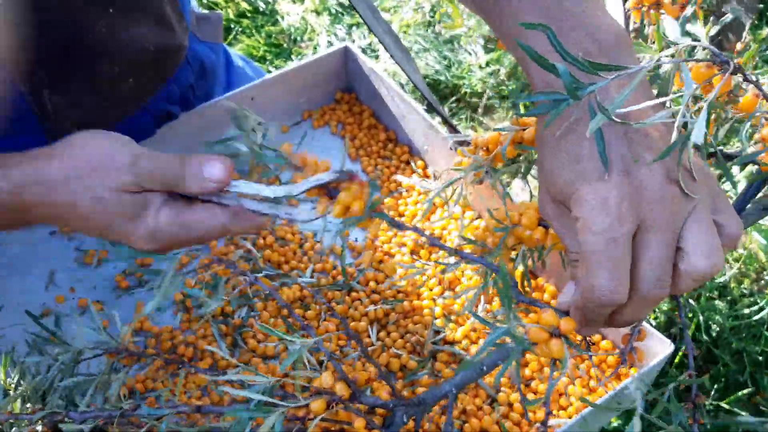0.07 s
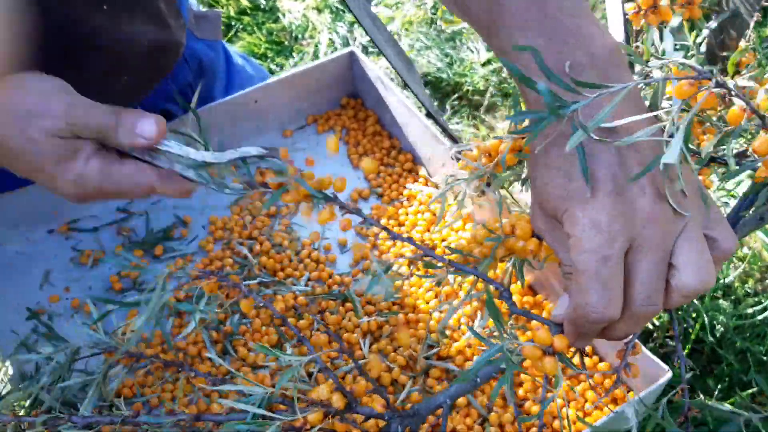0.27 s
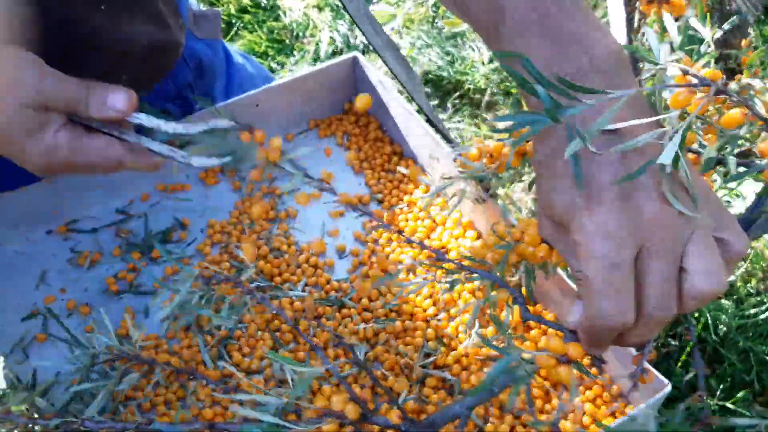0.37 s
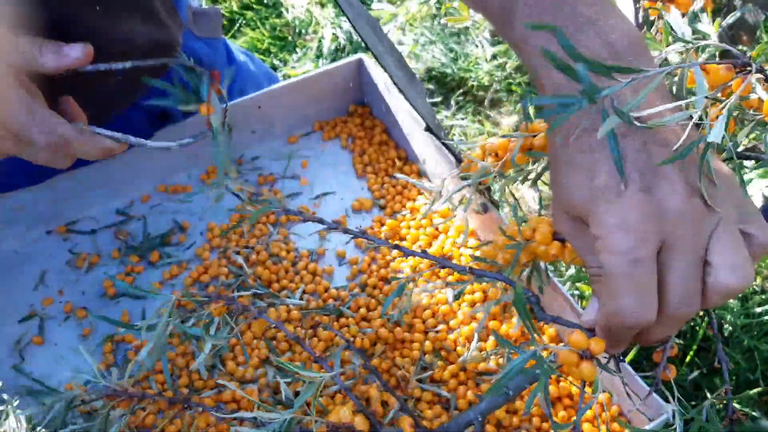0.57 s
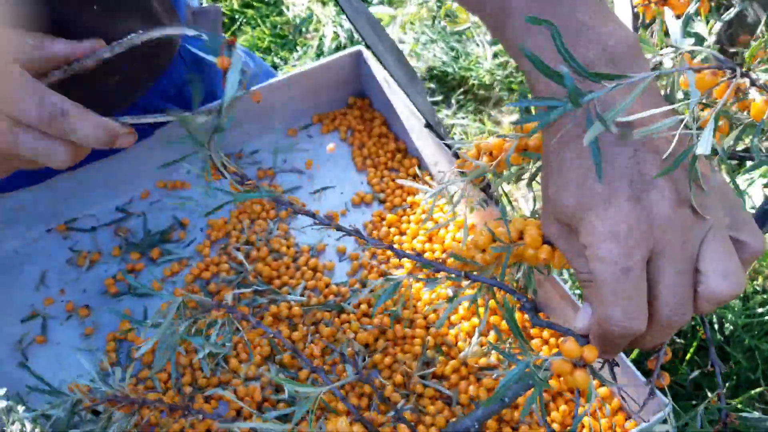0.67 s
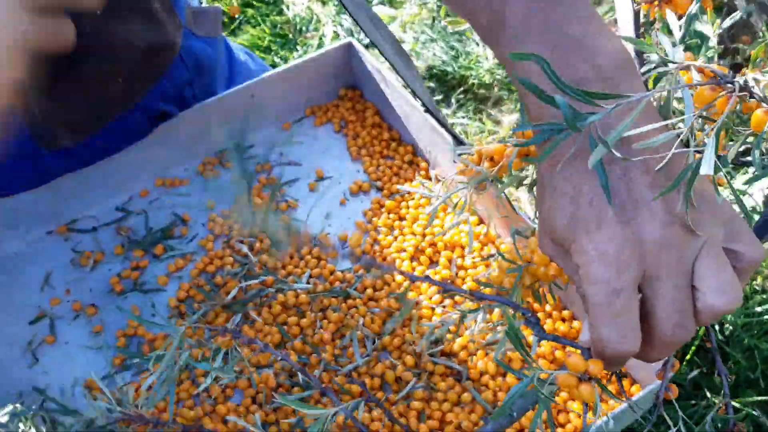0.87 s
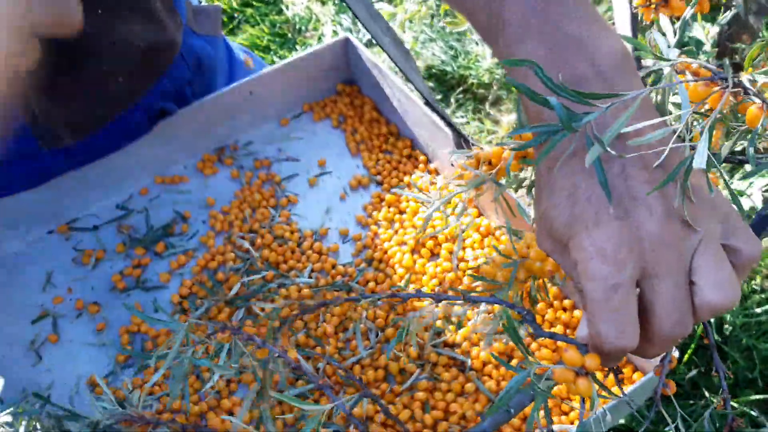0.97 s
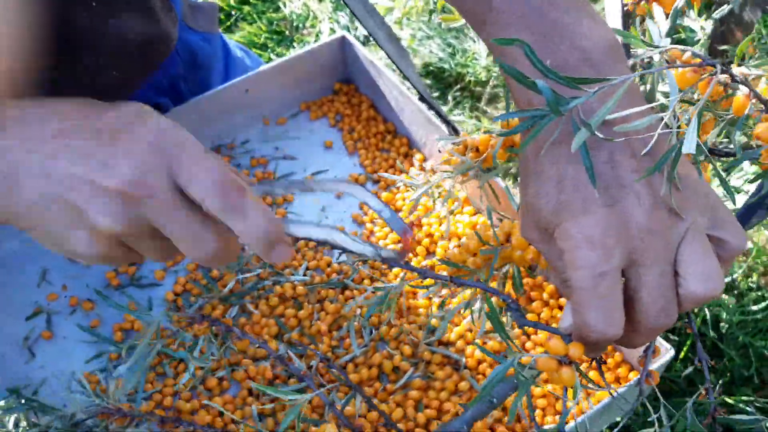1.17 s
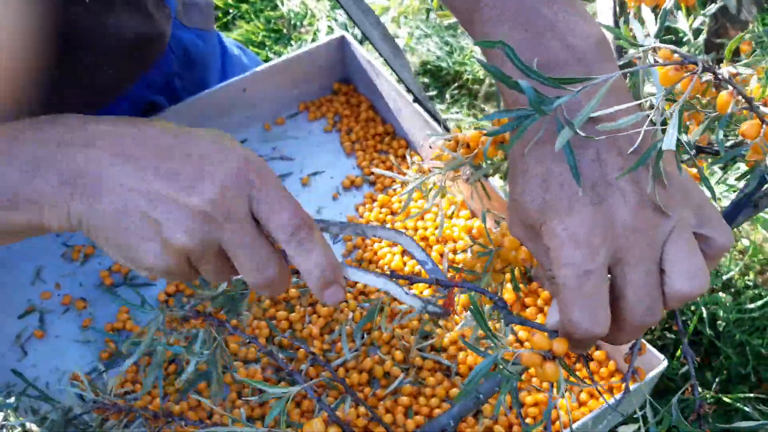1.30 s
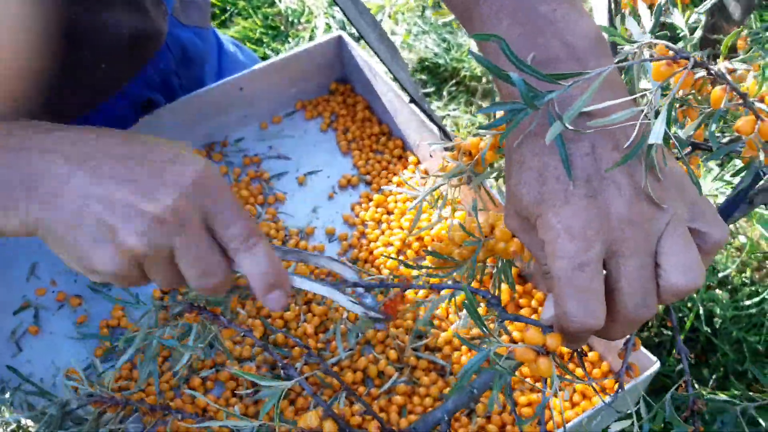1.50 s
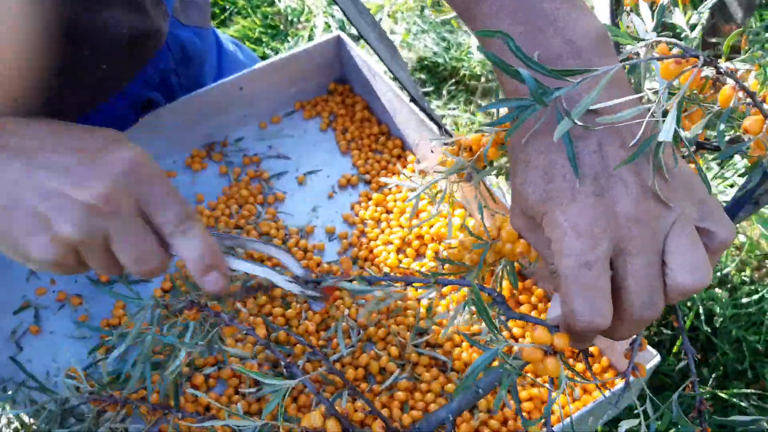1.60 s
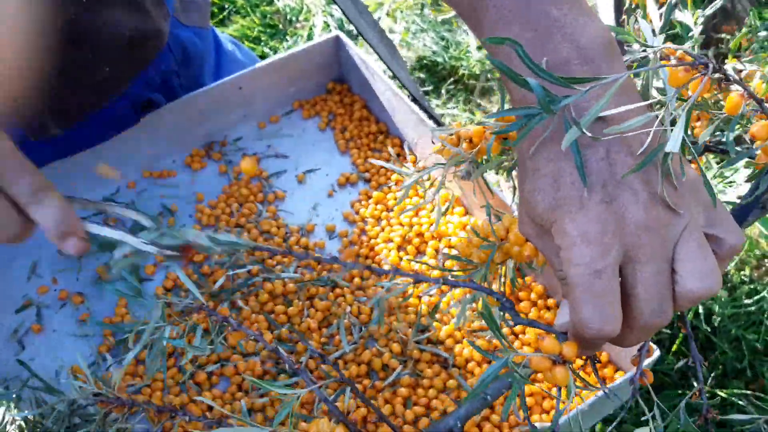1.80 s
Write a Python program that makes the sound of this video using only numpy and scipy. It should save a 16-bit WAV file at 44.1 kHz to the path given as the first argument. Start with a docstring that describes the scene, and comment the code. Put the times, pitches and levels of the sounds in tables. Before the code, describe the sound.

Berries are stripped from a branch outdoors, with crisp stalk snaps, rustling leaves and a scraping twig from the start. From about 0.2 to 0.7 seconds they patter into a box with soft, hollow knocks, and two faint ones follow around 1 second. Light wind bumps the microphone on the right, strongest near 0.6 seconds. After a lull, a second pull brings more snaps from 1.7 seconds.

```python
"""Outdoors, over a shallow box, berries are stripped from a branch with wire tongs.
Stalks snap and leaves hiss through the tongs while the twig scrapes; the berries drop,
knock on the floor of the box and set it ringing. A second pull begins at the end.
A light breeze buffets the right side of the microphone over a faint bed of open air."""
import sys
import numpy as np
from scipy import signal
from scipy.fft import rfft, irfft
from scipy.io import wavfile
from scipy.ndimage import uniform_filter1d

SR = 44100
rng = np.random.default_rng(int(sys.argv[2]) if len(sys.argv) > 2 else 0)


def transcribe(u):
    """Save the signal u as a 16-bit wav file named by the first command-line argument.

    u: samples, shape (n,) or (channels, n), limited to [-1, 1]; the rate is SR.
    q: integer samples, one column per channel.
    """
    v = np.clip(np.atleast_2d(u).T, -1, 1)
    q = np.round(v * 32767).astype(np.int16)
    wavfile.write(sys.argv[1], SR, q)


N = 81585
TIME = np.arange(N) / SR
HIGH_CUT_HZ, BOX_HIGH_HZ, TWIG_WIDTH = 16850, 2920, 0.61
# modes of the box, the main floor mode first: (frequency [Hz], level [dB], t60 [s])
BOX_MODES = [(618.8, 3.5, .14), (259, -2, 0.078), (289, -2.5, 0.19), (393, -7, 0.17), (429.5, -17, 0.45),
             (484.5, -5, 0.18), (722, -7, 0.12), (910, -6.5, 0.12), (1033, -17, 0.21), (1106.4, -10, 0.15),
             (1270, -8.5, 0.1), (1355, -20, .15), (1594, -6, 0.073), (1860, -7, 0.087), (2098, -7, 0.04),
             (2144, -8.5, 0.061), (2387, -0.5, 0.1)]


def from_db(db):
    """Decibels to gain."""
    return 10 ** (np.asarray(db) / 20)


def rms_one(x):
    """Scale to rms 1."""
    return x / np.sqrt(np.mean(x ** 2) + 1e-20)


def fader(curve):
    """Gain ride through (time [s], level [dB]) points."""
    return from_db(np.interp(TIME, *np.transpose(curve)))


def pan(db):
    """Left and right gains; positive dB leans left."""
    return from_db(np.array([[db], [-db]]) / 2)


def colour(x, spectrum):
    """EQ through (frequency [Hz], level [dB]) points; rms 1."""
    hz, db = np.transpose(spectrum)
    bins = np.maximum(np.arange(N // 2 + 1) * SR / N, 1)
    gains = from_db(np.interp(np.log(bins), np.log(hz), db))
    return rms_one(irfft(rfft(x) * gains, N))


def noise(width):
    """Stereo white noise; width 0 is mono, 1 is fully wide."""
    mid, side = rng.standard_normal((2, N))
    return rms_one(np.array([mid + width * side, mid - width * side]))


def band(x, low_hz, high_hz):
    """Band-pass; rms 1."""
    return rms_one(signal.sosfilt(signal.butter(2, [low_hz, high_hz], "band", fs=SR, output="sos"), x))


def drift(per_s):
    """Random wander through per_s points a second; rms 1."""
    return rms_one(np.interp(TIME * per_s, np.arange(N), rng.standard_normal(N)))


def decay(t, t60):
    """Envelope that falls 60 dB in t60 seconds."""
    return from_db(-60 * t / max(t60, .001))


def swell(peak_s, db, half_length):
    """Bell-shaped fade in and out."""
    return from_db(db) * np.exp(-.5 * ((TIME - peak_s) / half_length) ** 2)


def add(out, start_s, sound):
    """Mix a stereo sound in at a time."""
    i = max(int(start_s * SR), 0)
    out[:, i:i + sound.shape[1]] += sound[:, :N - i]


def box_ring(t, drive_db=0, sustain=1):
    """The struck box rings in decaying sines; the main mode starts inward, the others either way."""
    hz, db, t60 = np.transpose(BOX_MODES)
    polarity = np.append(1, rng.choice([-1, 1], len(hz) - 1))
    gains = from_db(db + drive_db) * polarity
    return sum(g * decay(t, d * sustain) * np.sin(2 * np.pi * f * t) for g, f, d in zip(gains, hz, t60))


def berries():
    """Each berry thuds and rings the box; soft landings lose the highs, those near a wall the lows."""
    # landings: (time [s], level [dB], brightness [Hz], ring length [ratio], main mode drive [dB],
    # low cut [Hz], note of the spot hit [Hz], level of that note [dB])
    landings = [(.216, -56.5, 600, 0.91, -21, 180, 323, 14),
                (0.2311, -37.5, 1430, 0.74, -0.5, 140, 242, 4.5), (0.292, -45.5, 640, 1, -3, 180, 304, -6),
                (0.3883, -37.5, 995, .8, 0, 170, 664, 4.5), (.468, -44.5, 607, 0.36, 8, 162, 250, -15),
                (.4705, -35.5, 670, 0.47, 7, 141, 233, 3.5), (.487, -37.5, 610, 0.42, -2, 150, 232, -9),
                (0.5156, -32.5, 1190, 0.74, -5.5, 250, 900, -2.5),
                (0.535, -37, 2200, 0.9, -7.5, 347, 1080, -4), (0.5556, -34.5, 650, 0.21, 0.5, 161, 285, 2),
                (.5585, -33, 670, 0.87, 6.5, 162, 293, 8.5), (0.6392, -31, 1720, 0.91, 3, 320, 840, 0.5),
                (.647, -31.5, 2110, 0.73, -33, 630, 1056, -21),
                (0.6674, -29, 397, 0.34, -13, 160, 292, 6.5), (0.6866, -35.5, 380, 0.46, -7, 150, 267, 3.5),
                (.711, -45, 360, 0.34, -5, 180, 307, 10), (0.9224, -50.5, 640, 0.45, -1.5, 170, 279.6, 8),
                (1.092, -55.5, 1310, 0.68, -4.5, 151, 269.5, 3.5)]
    out, t = np.zeros((2, N)), TIME[:N // 6]
    mode_spread_db, detune, push_hz = 1.5, .008, 500
    for start, db, bright_hz, sustain, main_db, low_hz, spot_hz, spot_db in landings:
        drive_db = mode_spread_db * rng.standard_normal(len(BOX_MODES))
        drive_db[0] = main_db
        ring = box_ring(t * (1 + detune * rng.standard_normal()), drive_db, sustain)
        push = from_db(4) * decay(t, t60=.0052) * np.cos(2 * np.pi * push_hz * t)
        thud = from_db(spot_db) * decay(t, t60=.042) * np.cos(2 * np.pi * spot_hz * t)
        knock_noise = band(noise(width=.34)[:, :len(t)], 190, BOX_HIGH_HZ)
        knock = decay(t, t60=.05 * sustain) * knock_noise
        contact_eq = np.vstack([signal.butter(3, bright_hz, fs=SR, output="sos"),
                                signal.butter(2, low_hz, "high", fs=SR, output="sos")])
        add(out, start, from_db(db) * signal.sosfilt(contact_eq, ring + push + thud + knock))
    return pan(2) * out


def stalks():
    """A stalk tears in a short burst of fibre cracks; thicker ones sound woodier."""
    # stalk snaps and twig ticks on the tongs:
    # (time [s], level [dB], t60 [s], woody body [dB], pan left [dB], brightness [Hz])
    snaps = [(0.021, -54, 0.21, -26, 7, 14200), (0.0815, -37, 0.012, -8, 1, 13500),
             (.222, -41.5, 0.026, -6, 4, 16000), (0.234, -55, 0.027, -6, -8, 16000),
             (.244, -49, 0.027, 8.5, -11, 16000), (0.262, -46.5, 0.078, -7, 11, 16000),
             (.285, -39.5, 0.04, 0, -5, 16000), (0.2902, -38.5, 0.019, -8.5, 11, 16000),
             (0.292, -36.5, 0.018, -7.5, 3, 16000), (.307, -37.5, 0.014, -6.5, 1, 17000),
             (0.3355, -33.5, 0.021, -2, 2.5, 14400), (0.351, -46, 0.027, 6, -3, 16000),
             (0.351, -43, 0.059, -10, 3, 16000), (0.375, -35.5, 0.016, -11.5, 5, 17000),
             (0.399, -48.5, 0.12, 1, -14, 15000), (0.635, -45.5, 0.045, 6, -4, 14000),
             (0.653, -53.5, 0.012, 10.5, -11, 15000), (.687, -55.5, 0.02, 4, -9, 13000),
             (0.7409, -41.5, 0.038, -1.5, 5.5, 10700), (0.844, -51, 0.1, -11, 6, 14000),
             (0.85, -54, 0.15, -19, 1, 13700), (0.931, -54, 0.0076, -29, 8, 10060),
             (1.09, -49.5, 0.053, -8.5, 2.5, 10100), (1.203, -69, 0.061, 6, 1, 9100),
             (1.366, -61, 0.092, -3.5, 4.5, 11600), (1.739, -54, 0.023, -3, 4, 13000),
             (1.743, -44.5, 0.044, -2.5, 1, 12900), (1.754, -36.5, 0.02, -6.5, 5.5, 12200),
             (1.786, -42.5, 0.061, -7, 1, 12300), (1.7914, -38, 0.03, -5.5, 4, 11970),
             (1.8288, -34.5, 0.021, -5, 7, 12500)]
    # crisp top of cracking fibres: (frequency [Hz], level [dB])
    crack_eq = [(1500, -21), (3000, -63), (6000, -7.5), (7200, -0.5), (9000, 1.5), (11000, 6), (12800, 3.5),
                (15300, 5), (17000, -9.5)]
    # woody body of a stalk: (frequency [Hz], level [dB])
    wood_eq = [(500, -43), (1500, -7), (2400, -4.5), (2950, 3), (3600, -5), (4200, 0), (4600, 0),
               (5000, -3.5), (7000, -10.5), (9000, -18), (16000, -5)]
    out, t = np.zeros((2, N)), TIME[:N // 20]
    attack_s, hold_s, grain_db = .0004, .0009, 2
    fibres = noise(width=.9) * from_db(grain_db * drift(per_s=6000))
    crack = colour(fibres, crack_eq)
    wood = colour(noise(width=.9), wood_eq)
    for start, db, t60, wood_db, pan_db, bright_hz in snaps:
        i = rng.integers(N - len(t))
        burst = (crack + from_db(wood_db) * wood)[:, i:i + len(t)]
        envelope = np.minimum(t / attack_s, 1) * decay(np.maximum(t - hold_s, 0), t60)
        soften = signal.butter(1, min(bright_hz, HIGH_CUT_HZ), fs=SR)
        add(out, start, from_db(db) * pan(pan_db) * signal.lfilter(*soften, envelope * burst))
    return out


def leaves():
    """Leaves slip through the tongs in dense tiny ticks and hiss, roughened by small tears."""
    # leaf friction through the pulls: (time [s], level [dB])
    pull_ride = [(0, -57.5), (.07, -57.5), (.11, -61.5), (.21, -59.5), (.235, -45), (.28, -53),
                 (.32, -59.5), (.365, -52.5), (.405, -45), (.48, -49.5), (.62, -53.5), (.70, -62.5),
                 (.82, -66), (1.0, -71), (1.17, -78), (1.26, -75.5), (1.34, -85), (1.53, -77), (1.64, -62),
                 (1.73, -65), (1.76, -57.5), (1.815, -57.5), (1.85, -55)]
    # bright hiss of sliding leaves: (frequency [Hz], level [dB])
    leaf_eq = [(1470, -9), (2500, -5), (3440, -7.5), (4080, -6), (5740, -13.5), (7950, -6), (9360, -9),
               (12600, -6), (15300, -8), (16500, -44)]
    slips_per_s, grain_db, hiss_db = 6000, 2.8, 3
    tears_per_s, tear_depth = 320, .35
    slips = rng.random(N) < slips_per_s / SR
    slip_gains = from_db(grain_db * np.minimum(rng.exponential(1, N), 5))
    ticks = rms_one(slips * slip_gains * noise(width=1))
    friction = ticks + from_db(hiss_db) * noise(width=1)
    tears = (rng.random(N) < tears_per_s / SR) * rng.random(N)
    tear_tails = rms_one(signal.fftconvolve(tears, decay(TIME, t60=.009))[:N])
    roughness = rms_one(1 + tear_depth * tear_tails)
    return fader(pull_ride) * pan(4) * colour(friction * roughness, leaf_eq)


def twig():
    """The twig gives a duller scrape that also stirs the upper modes of the box."""
    # weight of the scrape: (time [s], level [dB])
    scrape_ride = [(0, -74), (.11, -65.5), (.15, -59), (.20, -61.5), (.26, -52), (.35, -62), (.41, -46.5),
                   (.56, -44), (.64, -47), (.72, -56), (.90, -58), (1.02, -64), (1.17, -69), (1.22, -67),
                   (1.32, -68), (1.55, -72), (1.65, -66.5), (1.85, -68)]
    # tone of the scraped twig: (frequency [Hz], level [dB])
    twig_eq = [(200, 13), (400, 2), (620, 15.5), (800, -7), (1080, 7.5), (1350, -2), (1800, -1.5),
               (2150, 5.5), (2550, 2.5), (3200, -1.5), (4300, -2), (6000, -10), (12000, -17)]
    ring = signal.fftconvolve(noise(TWIG_WIDTH), box_ring(TIME[:N // 6])[None])[:, :N]
    upper_ring = from_db(-7.5) * band(ring, 1090, BOX_HIGH_HZ)
    scrape = colour(noise(TWIG_WIDTH), twig_eq)
    return fader(scrape_ride) * pan(2) * (scrape + upper_ring)


def branch():
    """The branch brushes past leaves and box in faint, narrow-band swishes."""
    # swishes: (peak time [s], level [dB], half-length [s], low edge [Hz], high edge [Hz])
    swishes = [(0.157, -59, 0.013, 1043, 1110), (0.879, -57.5, 0.014, 1010, 1140),
               (1.233, -63, .045, 508, 583), (1.245, -75.5, .03, 6300, 7300)]
    return sum(swell(peak_s, db, half_length) * band(noise(TWIG_WIDTH), low_hz, high_hz)
               for peak_s, db, half_length, low_hz, high_hz in swishes)


def wind():
    """Each eddy is a dip of pressure that throbs briefly over a faint rumble, nearly all on the right."""
    # eddies on the microphone: (peak time [s], level [dB], half-length [s], throb [Hz])
    eddies = [(.181, -53.5, 0.016, 98), (0.372, -44, .0059, 80), (0.482, -43.5, 0.013, 76),
              (0.542, -39, 0.018, 78.4), (0.5834, -19.5, 0.0054, 131), (0.6, -22.5, 0.014, 87.5),
              (0.636, -35.5, 0.014, 99), (0.701, -40, 0.025, 66.3), (.853, -38.5, 0.0066, 96),
              (0.868, -30.5, 0.0066, 90.6), (0.912, -49, 0.032, 69), (0.956, -42, 0.0046, 75),
              (1.079, -47, 0.0095, 70), (1.13, -31, 0.0086, 89), (1.164, -31.5, 0.0044, 89),
              (1.208, -36.5, 0.013, 112), (1.231, -34, 0.0029, 134), (1.251, -28.5, 0.011, 80),
              (1.283, -24, 0.0043, 110), (1.352, -37.5, 0.0074, 95), (1.43, -38.5, 0.0073, 104),
              (1.486, -33.5, 0.0036, 108.5), (1.499, -41.5, 0.005, 75), (1.676, -50.5, 0.02, 69),
              (1.778, -49.5, 0.016, 65), (1.833, -43, 0.026, 72.3)]
    # wind rumble: (frequency [Hz], level [dB])
    rumble_eq = [(18, -39), (30, -27), (42, -2), (60, 10), (95, -2.5), (140, -1), (200, -13), (300, -17.5),
                 (600, -40.5), (1500, -67)]
    # the breeze building: (time [s], level [dB])
    breeze_ride = [(0, -106), (.17, -78), (.7, -55), (1.02, -55.5), (1.3, -51.5), (1.6, -54), (1.85, -50.5)]
    wobble_rad = .25 * rms_one(uniform_filter1d(drift(per_s=130), size=200))
    gusts, throbs = 0, 0
    for peak_s, db, half_length, hz in eddies:
        gust = swell(peak_s, db, half_length)
        gusts += gust
        throbs -= np.sqrt(2) * gust * np.cos(2 * np.pi * hz * (TIME - peak_s) + wobble_rad)
    rumble = (fader(breeze_ride) + from_db(-11) * gusts) * colour(noise(width=1), rumble_eq)
    return from_db([[-30], [0]]) * (throbs + rumble)


def open_air():
    """A faint, steady outdoor bed, leaning left."""
    # outdoor ambience: (frequency [Hz], level [dB])
    air_eq = [(20, -29), (70, 7.5), (180, -15.5), (280, 5.5), (430, -7), (550, -2.5), (800, -7.5),
              (1200, -17.5), (1380, -1), (1550, -16.5), (2300, -9), (3000, -64), (5800, -42), (7000, -20.5),
              (16000, -22)]
    return from_db(-70) * pan(7) * colour(noise(width=.2), air_eq)


def scene():
    """The picking, which reaches the left ear first, over the breeze and the open air."""
    flutter_db, right_delay_s = 1, .00014
    hits = berries() + stalks()
    rustle = from_db(flutter_db * drift(per_s=150)) * (leaves() + twig())
    left, right = hits + rustle + branch()
    picking = np.array([left, np.roll(right, round(right_delay_s * SR))])
    return picking + wind() + open_air()


def record(dry):
    """The right microphone is hollow in the upper mids; both lose the deepest rumble and the very top."""
    notch = signal.iirnotch(2574, Q=2.77, fs=SR)
    low_cut = signal.butter(2, 36, "high", fs=SR, output="sos")
    high_cut = signal.cheby2(16, 60, HIGH_CUT_HZ, fs=SR, output="sos")
    stereo = [dry[0], signal.lfilter(*notch, dry[1])]
    return signal.sosfilt(high_cut, signal.sosfilt(low_cut, stereo))


dry = scene()
out = record(dry)
transcribe(out)
```